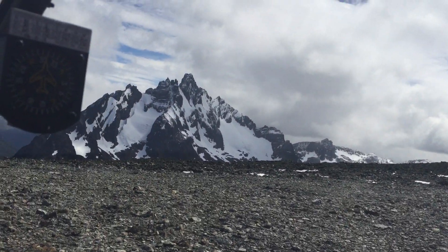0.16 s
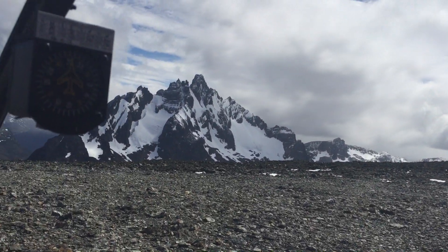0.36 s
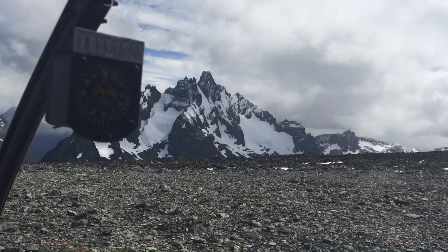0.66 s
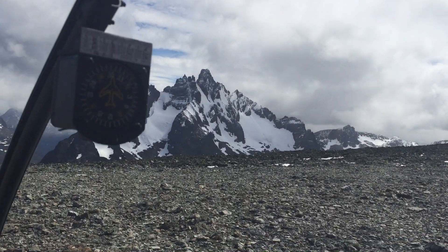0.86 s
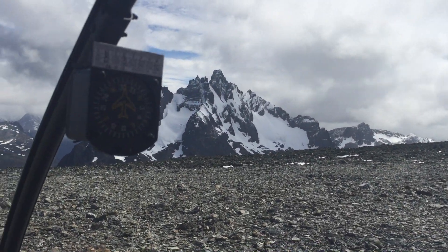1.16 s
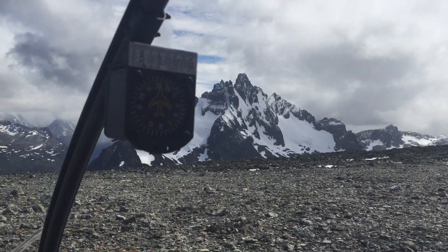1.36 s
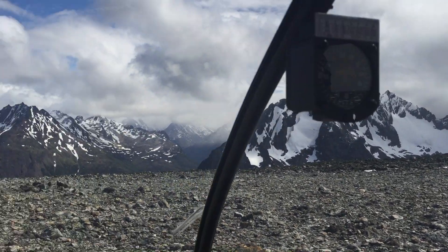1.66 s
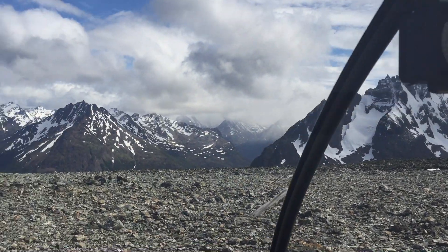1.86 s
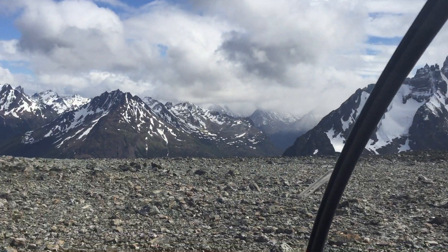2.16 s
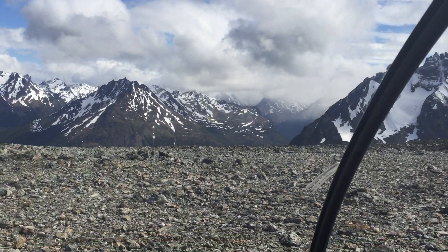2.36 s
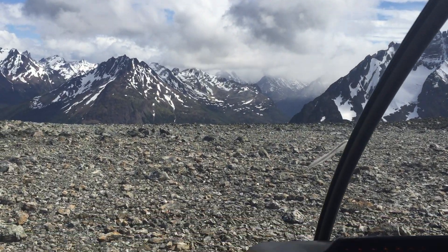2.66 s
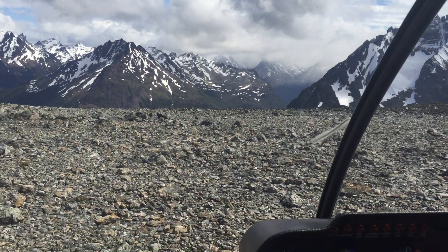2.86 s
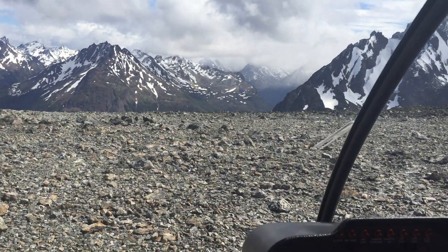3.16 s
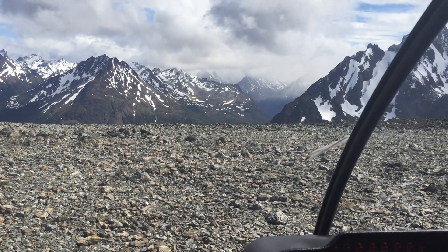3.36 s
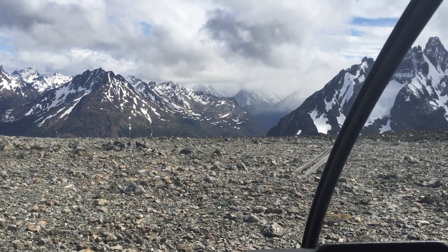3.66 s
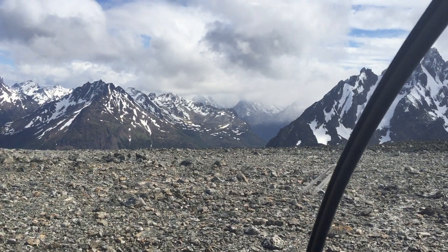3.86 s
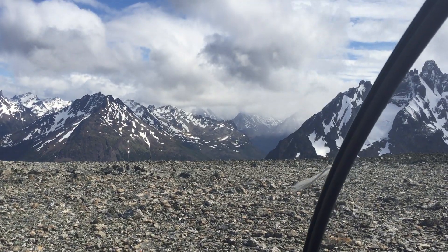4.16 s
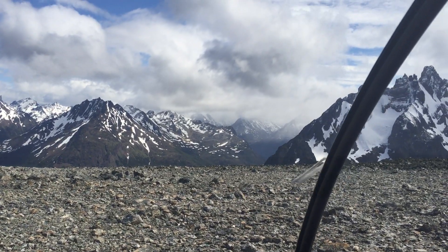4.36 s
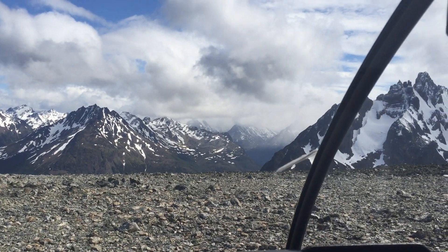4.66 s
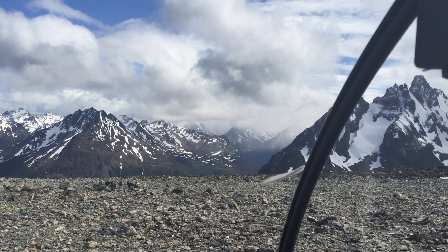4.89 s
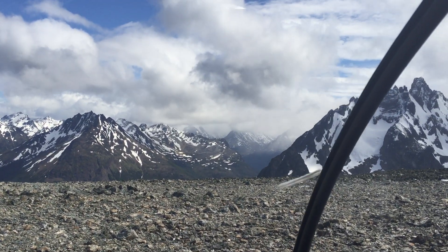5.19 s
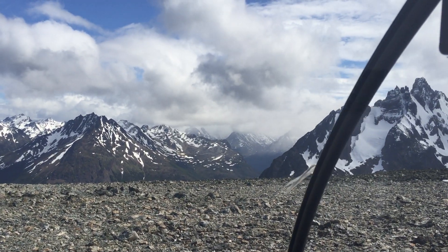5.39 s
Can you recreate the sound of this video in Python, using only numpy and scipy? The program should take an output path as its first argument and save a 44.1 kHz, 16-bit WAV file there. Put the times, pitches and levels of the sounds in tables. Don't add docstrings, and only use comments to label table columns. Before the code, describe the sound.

A helicopter cabin with engine droning at constant speed, blades chopping quickly overhead, wind buffeting the door gap and loose panels knocking.

```python
import sys
import numpy as np
from scipy import signal
from scipy.fft import rfft, irfft, next_fast_len
from scipy.io import wavfile
from scipy.ndimage import uniform_filter1d, map_coordinates

SR = 44100
rng = np.random.default_rng(int(sys.argv[2]) if len(sys.argv) > 2 else 0)


def gain_from_db(level_db):
    decades = np.asarray(level_db, float) / 20
    return 10 ** decades


def file_out(sig):
    cols = np.atleast_2d(sig).T
    lim = np.clip(cols, -1, 1)
    pcm = np.round(lim * 32767).astype(np.int16)
    wavfile.write(sys.argv[1], SR, pcm)


N = 243961
SECONDS = np.arange(N) / SR
FIRING_HZ = 136.1
BLADE_TURNS = .599

# time_s, level_db
FIRING_TONE = [(0.0, -19), (0.6, -19), (0.8, -22.5), (1.25, -17.5), (1.7, -22.5), (2.0, -22.5),
               (2.15, -23.5), (2.4, -21), (2.75, -22), (3.0, -28.5), (3.3, -21.5), (3.8, -28), (4.3, -23.5),
               (4.5, -20.5), (4.85, -16), (5.08, -21), (5.28, -17), (5.53, -22)]
# multiple_of_cam_turn, level_db
ENGINE_TONES = [(3, -32.6), (4, -40.2), (5, -34.9), (7, -35.9), (8, -35.6), (9, -32.9), (10, -39.0),
                (11, -42.2), (12, -34.0), (13, -38.5), (14, -37.5), (15, -43.9), (16, -46.3), (20, -49.2),
                (21, -53.7), (24, -54.0), (26, -55.1), (27, -54.1), (28, -54.5), (29, -50.1)]
# multiple_of_cam_turn, level_db
CRANK_TONE = (2, -33)
# multiple_of_cam_turn, level_db
TAIL_ROTOR_TONES = [(3.561, -31), (7.122, -32), (10.684, -39)]
# multiple_of_cam_turn, level_db
WHINE_TONES = [(44.02, -49.5), (85.25, -57), (102.4, -62), (153.6, -70), (223.7, -75)]
# time_s, gear_mesh_db, fan_blades_db
FACING_DRIVE = [(0.0, -40, -47), (0.4, -40.5, -49), (0.8, -34.5, -46.5), (1.5, -36, -50), (1.9, -35, -45),
                (2.4, -38.5, -42.5), (3.0, -38.3, -46), (4.6, -37.5, -47), (5.53, -44, -50)]
# pitch_hz, level_db
RUMBLE_COLOUR = [(12, -28), (25, -20), (34, -17), (44, -22), (70, -6.5), (95, -4.5), (125, 2), (150, 2.5),
                 (220, -13), (300, -24)]
# pitch_hz, level_db (per Hz)
ROAR_COLOUR = [(220, -51), (380, -2), (495, -7), (655, -6), (853, -11.5), (1080, -9), (1240, -13),
               (1970, -20), (2610, -25.5), (3190, -27), (4860, -34), (6330, -34.5), (7870, -44.5),
               (11400, -42.5), (15600, -52)]
# time_s, roof_slap_db, tips_through_door_db
FACING_BLADES = [(0.0, -37, -9), (0.5, -39, -5), (0.9, -38, -15), (1.15, -31.5, -5), (1.4, -35.5, -13),
                 (1.8, -30, -14), (2.2, -30, -16), (2.7, -34.5, -10), (3.25, -28, -6), (3.7, -33, -5),
                 (3.95, -31, 1.5), (4.3, -30, 2), (4.62, -32, -3), (4.85, -31, 0), (5.06, -44, -3.5),
                 (5.3, -31, 1), (5.53, -40, 4)]
# pitch_hz, level_db
SLAP_COLOUR = [(250, -25), (400, -4), (560, 4), (700, -1), (900, -3), (1400, -15.5), (2500, -29),
               (5000, -48)]
# pitch_hz, width_hz, level_db
TIP_SWISH = [(6150, 1200, -0.5)]
# pitch_hz, width_hz, level_db
TIP_HISS = [(9500, 1100, -3), (11300, 1700, 6), (12600, 1700, 2)]
# start_s, peak_db, pitch_hz
PANEL_THUDS = [(0.095, -16, 444), (0.24, -26, 516), (0.548, -7, 411), (1.344, -19, 603), (1.434, -7, 412),
               (1.564, -8.5, 420), (1.642, -13, 412), (1.786, -12, 597), (1.853, -8.5, 450),
               (2.007, -16, 602.5), (2.095, -11, 598), (2.232, -12.5, 420), (3.032, -18, 583),
               (3.183, -10.5, 483), (3.251, -19, 560), (3.63, -23, 516), (4.153, -18, 436.5),
               (4.293, -12.5, 673), (4.529, -10, 650), (4.585, -17, 524), (4.675, -13.5, 625),
               (4.81, -9.5, 494), (5.1, -11.5, 491), (5.317, -29, 624), (5.392, -30, 710.5)]
# start_s, peak_db, brightness_db (above 9 kHz)
TRIM_KNOCKS = [(0.1665, -33, -25), (0.2409, -31, -30), (0.287, -26.5, -29), (0.333, -28, -30),
               (0.385, -23, -11), (0.611, -30, -30), (0.734, -26, -30.5), (0.9558, -27, -31),
               (1.4145, -30, -23), (1.4942, -29, -19), (1.714, -30, -23), (1.8612, -25, -23),
               (2.318, -27, -28), (2.5414, -27, -27), (2.6182, -25, -30), (2.6708, -23.5, -24),
               (2.6948, -22.5, -34), (2.7206, -32, -25), (2.765, -23.5, -23), (2.8674, -27.5, -15),
               (2.89, -26, -26), (2.942, -29, -30), (2.9906, -27, -31), (3.1304, -26, -27),
               (3.256, -24.5, -27), (3.312, -25, -25), (3.454, -26.5, -18), (3.6502, -25, -27),
               (4.6985, -26.5, -28), (5.134, -28, -30)]
# pitch_hz, level_db
TRIM_BODY = [(800, -25), (1800, 2.5), (3000, -8), (5000, -14), (7500, -19.5), (9000, -26)]
# pitch_hz, level_db
TRIM_EDGE = [(7000, -12), (9000, 3), (12000, -7), (16500, -5)]
# start_s, level_db
BUCKLE_CHINK = (3.28, -43)
# pitch_hz, level_db, fade_by_60_db_s
BUCKLE_MODES = [(7900, -11, .04), (8635, -10, .04), (10850, -3, .06), (11660, -10, .06), (13220, 0, .11),
                (14270, -3, .05)]
# pitch_hz, width_hz, level_db
MICROPHONE_DIPS = [(5080, 500, -2.5), (10440, 230, -2)]
# pitch_hz, level_db
EXHAUST_COLOUR = [(170, -31), (215, 3.5), (260, 1), (330, 4.5), (400, -1.5), (480, -7)]
# time_s, level_db
WASH = [(0.0, 0), (0.5, -7.5), (0.9, -2.5), (1.3, -5.5), (1.7, -4), (1.95, 0.5), (2.1, -4.5), (2.4, 1.5),
        (2.6, -1), (2.9, 2), (3.3, -2), (3.6, 0.5), (4.0, -1.5), (4.3, -2), (4.55, 1.5), (4.95, -9),
        (5.25, -3), (5.53, -6)]
# middle_s, peak_db, length_s
DOOR_GUSTS = [
    (0.4, -32, 0.19),
    (0.95, -35, .12),
    (1.6, -33, .1),
    (1.946, -25, .15),
    (2.55, -27, .12),
    (3.15, -25, 0.13),
    (3.55, -32, 0.14),
    (4.103, -17, 0.27),
    (4.8, -23.5, 0.098),
    (5.2, -21.5, .18),
]
# middle_s, extra_db, length_s
HAND_SHIFTS = [
    (.3, 6.5, 0.34),
    (2.8, 5, 0.41),
]


def evened(x):
    return x / np.sqrt(np.mean(x ** 2) + 1e-20)


def along(rows):
    s, *columns = np.transpose(rows)
    return [np.interp(SECONDS, s, column) for column in columns]


def add(mix, s, sound):
    part = mix[round(s * SR):][:len(sound)]
    part += sound[:len(part)]


def noise(points):
    hz, db = np.transpose(points)
    size = next_fast_len(N)
    bins = np.fft.rfftfreq(size, 1 / SR) + 1
    colour = gain_from_db(np.interp(np.log(bins), np.log(hz), db, -120, -120))
    white = rfft(rng.standard_normal(size))
    return evened(irfft(white * colour, size)[:N])


def drift(hz):
    knots, coarse = rng.standard_normal(400), np.arange(0, N + 64, 64)
    curve = evened(map_coordinates(knots, [coarse / SR * hz], order=3))
    return np.interp(np.arange(N), coarse, curve)


def patchy(x, patch_db, bins, frames, size):
    z = signal.stft(x, nperseg=size)[2]
    field = rng.standard_normal(z.shape)
    field = uniform_filter1d(field, bins, 0)
    field = evened(uniform_filter1d(field, frames, 1))
    return evened(signal.istft(z * gain_from_db(patch_db * field), nperseg=size)[1][:N])


def tone(cam, turns, db, waver_db, waver_hz, slip):
    angle = 2 * np.pi * (turns * cam + rng.random()) + slip * drift(waver_hz)
    return np.sqrt(2) * gain_from_db(db + waver_db * drift(waver_hz)) * np.cos(angle)


def passes(cam, at, sharp, uneven_db):
    turns = BLADE_TURNS * cam - at
    each_pass = gain_from_db(uneven_db * rng.standard_normal(100))
    strength = each_pass[np.round(turns).astype(int) + 1]
    return evened(strength * np.exp(sharp * (np.cos(2 * np.pi * turns) - 1)))


def door_gap(cam):
    gusts = gain_from_db(-43.5)
    gusts = gusts + sum(gain_from_db(db) * np.exp(-((SECONDS - s) / length) ** 2) for s, db, length in DOOR_GUSTS)
    hum = tone(cam, 2.43, -1.5, 1.2, 10., .9)
    breath = gain_from_db(-12.0) * noise([(38, -25), (46, -29), (55, 8), (62, 16), (72, -35)])
    return gusts * (hum + breath)


def cabin_air():
    wash_db = along(WASH)[0]
    boom = noise([(118, -28), (130, -10.5), (142, -8), (155, -1.5), (175, -9.0), (200, -5.0), (230, -29)])
    boom *= gain_from_db(-19 + 2.25 * wash_db - 4.0)
    rumble = noise(RUMBLE_COLOUR) * gain_from_db(-24 + 0.9 * wash_db + 2.0)
    return boom + rumble


def engine_roar(cam):
    roar_db = -39.5 + 0.17 * along(WASH)[0] + 8.0 + 0.67 * drift(25.04)
    roar = patchy(noise(ROAR_COLOUR), 2.35, 2, 3, size=1024)
    return gain_from_db(roar_db) * roar * passes(cam, 0.34, 0.09, 0.29)


def buckle():
    out, t = np.zeros(N), np.arange(6000) / SR
    ring = sum(gain_from_db(db - 60 * t / t60) * np.sin(2 * np.pi * hz * t) for hz, db, t60 in BUCKLE_MODES)
    s, db = BUCKLE_CHINK
    add(out, s, gain_from_db(db) * np.minimum(t / .008, 1) * ring)
    return out


def shakes():
    late, size = np.clip(rng.standard_normal((150, 2)), -1.5, 1.5).T
    passed = np.arange(150) / 2 + .3
    at = abs(passed * 6 / (BLADE_TURNS * FIRING_HZ) + 0.0113 * late)
    db = -36.5 + 3.5 * size
    db += sum(more_db * np.exp(-((at - s) / length) ** 2) for s, more_db, length in HAND_SHIFTS)
    db -= 4.4 * (np.arange(len(at)) % 2)
    return [(s, level, -21) for s, level in zip(at, db)]


def trim():
    body, edge, t = np.zeros(N), np.zeros(N), np.arange(3000) / SR
    shape = np.minimum(t / 0.0044, 1) * np.exp(-(t / .02) ** 2)
    for s, db, bright_db in TRIM_KNOCKS + shakes():
        add(body, s, gain_from_db(db - 12.0) * shape)
        add(edge, s, gain_from_db(db + bright_db - 10.0) * shape)
    ragged = gain_from_db(0.94 * evened(uniform_filter1d(rng.standard_normal(N), 64)))
    body *= patchy(noise(TRIM_BODY), 2.6, 2, 4, size=256)
    edge *= patchy(noise(TRIM_EDGE), 5.3, 4, 4, size=256)
    return ragged * (body + edge)


def panels():
    out, t = np.zeros(N), np.arange(3000) / SR
    for s, db, hz in PANEL_THUDS:
        ring = np.sin(2 * np.pi * hz * t) + 0.36 * np.sin(2 * np.pi * 1.37 * hz * t)
        fade = gain_from_db(db - 6.0 - 60 * t / 0.065)
        add(out, s, fade * np.minimum(t / 0.0017, 1) * ring)
    return out


def drive_train(cam):
    gear_db, fan_db = along(FACING_DRIVE)
    out = sum(tone(cam, turns, db, 2., 2.5, .3) for turns, db in TAIL_ROTOR_TONES)
    out += sum(tone(cam, turns, db, 2.5, 4., .6) for turns, db in WHINE_TONES)
    out += tone(cam, 17.06, gear_db + 1.5, 1.2, 5., .25)
    out += tone(cam, 2 * 17.06, fan_db + 1., 2.2, 6., .4)
    third_db = -47.5 - 1.25 * SECONDS
    out += tone(cam, 51.15, third_db - .3, 1.5, 5., .4)
    return out + tone(cam, 48.07, 1.4 * (fan_db + 46) - 44, 1.4, 7., .45)


def resonate(x, hz, width):
    turn, r = np.exp(2j * np.pi * np.cumsum(hz) / SR), np.exp(-np.pi * width / SR)
    smooth = signal.lfilter([1], np.convolve([1, -r], [1, -r]), x / turn)
    return evened((turn * smooth).real)


def whistle(cam, bands, at, glide):
    doppler = 1 - glide * np.sin(2 * np.pi * (BLADE_TURNS * cam - at))
    hiss = rng.standard_normal(N)
    return evened(sum(gain_from_db(db) * resonate(hiss, hz * doppler, width) for hz, width, db in bands))


def rotor(cam):
    slap_db, tips_db = along(FACING_BLADES)
    slap = passes(cam, .44, 1.4, .5) * noise(SLAP_COLOUR)
    swish = passes(cam, .18, 1.3, 1.3) * whistle(cam, TIP_SWISH, .2, .06)
    hiss = passes(cam, .26, .75, 1.) * whistle(cam, TIP_HISS, .27, .06)
    open_door = np.clip((SECONDS - 3.5) / 0.35, .2, 1)
    out = gain_from_db(slap_db - 3.0) * slap
    out += open_door * gain_from_db(-52.5 + tips_db - 3.0) * swish
    return out + gain_from_db(-53 + tips_db - 5.5) * hiss


def toward_engine():
    firing_db = along(FIRING_TONE)[0]
    return .5 * (firing_db - firing_db.mean())


def exhaust(cam):
    growl_db = -27.5 + 0.32 * along(WASH)[0] - 0.77 * toward_engine()
    growl_db -= 11 * np.maximum(SECONDS - 4.9, 0)
    return gain_from_db(growl_db - 2.0) * passes(cam, 0.41, 0.24, 1.0) * noise(EXHAUST_COLOUR)


def engine(cam):
    out = tone(cam, 6, along(FIRING_TONE)[0], 1.0, 9., 0.14)
    change_db = 1.5 + 2 * 0.31 * toward_engine() - 0.52 * SECONDS
    tones = ENGINE_TONES + [CRANK_TONE]
    return out + sum(tone(cam, turns, db + change_db, 1.5, 3., .15) for turns, db in tones)


def scene():
    cam = FIRING_HZ / 6 * SECONDS
    background = door_gap(cam) + cabin_air() + engine_roar(cam)
    loose_parts = buckle() + trim() + panels()
    machine = drive_train(cam) + rotor(cam) + exhaust(cam) + engine(cam)
    return (background + loose_parts + machine)[None]


def roll_off(x):
    return signal.sosfilt(signal.butter(12, 15740, fs=SR, output="sos"), x)


def record(dry):
    size = next_fast_len(N)
    bins = np.fft.rfftfreq(size, 1 / SR)
    port = gain_from_db(sum(db * np.exp(-((bins - hz) / width) ** 2) for hz, width, db in MICROPHONE_DIPS))
    heard = irfft(rfft(dry, size) * port, size)[:, :N]
    heard /= (1 + (heard / .7) ** 4) ** (1 / 4)
    return roll_off(heard)


dry = scene()
out = record(dry)
file_out(out)
```